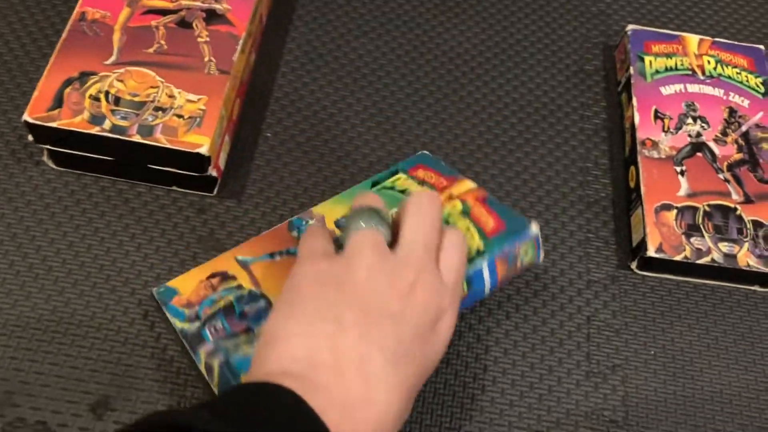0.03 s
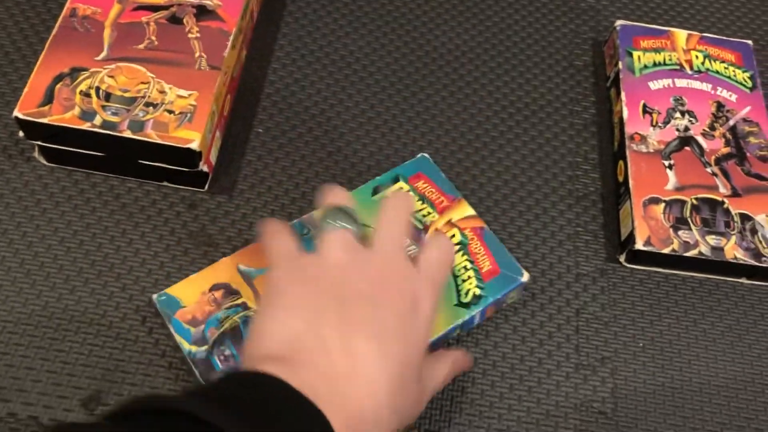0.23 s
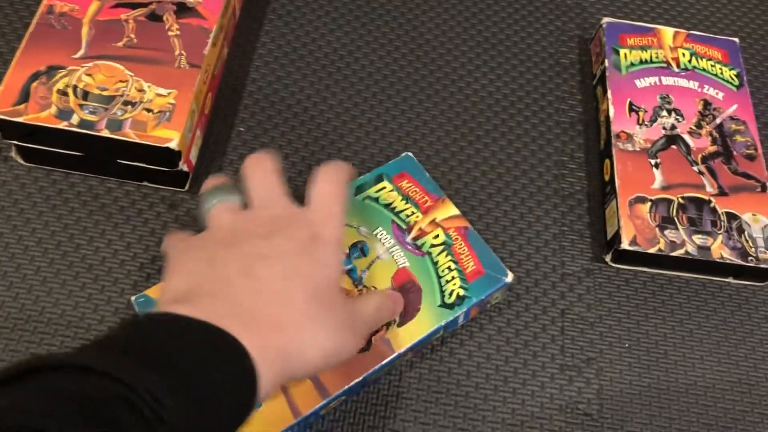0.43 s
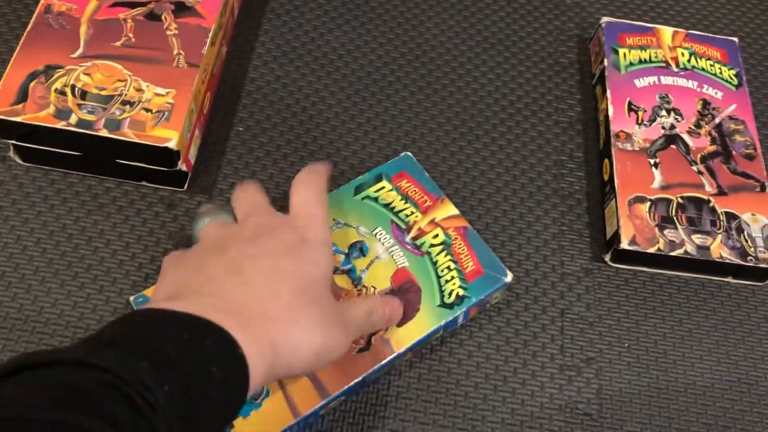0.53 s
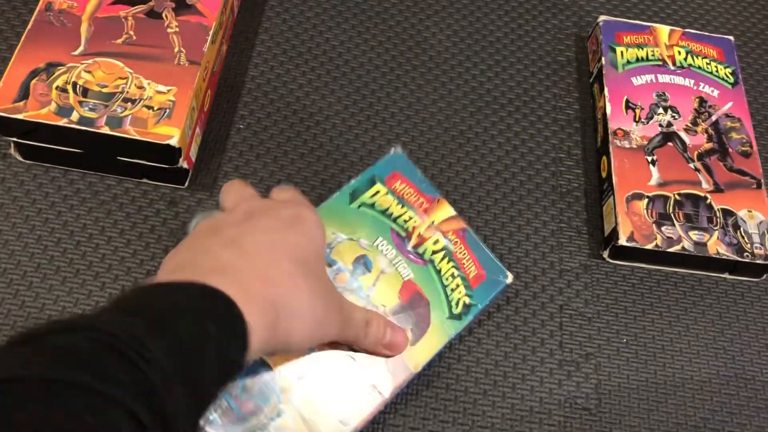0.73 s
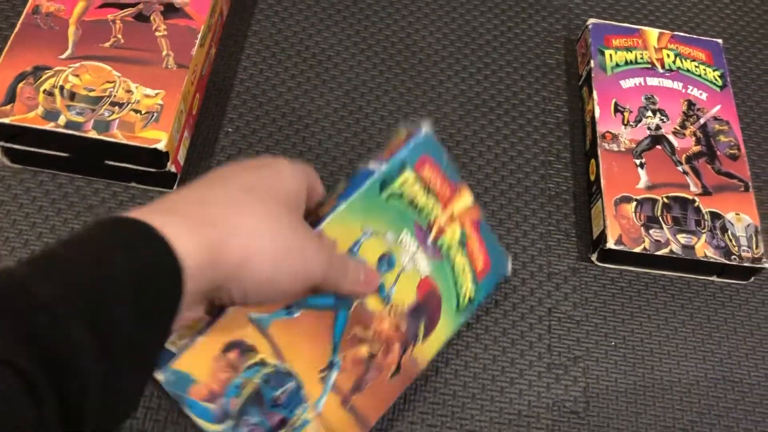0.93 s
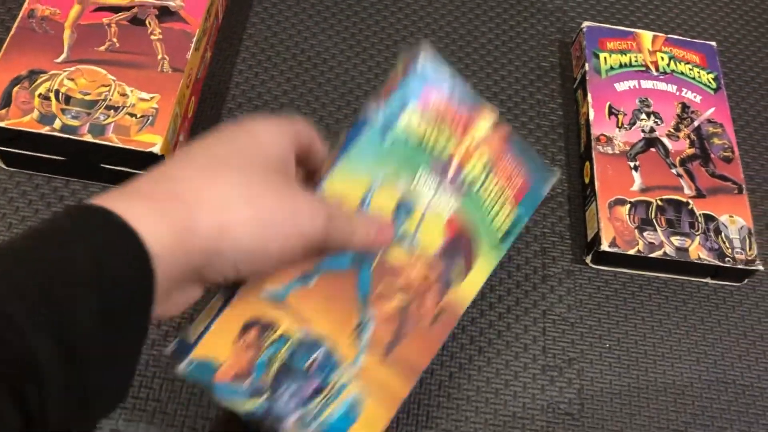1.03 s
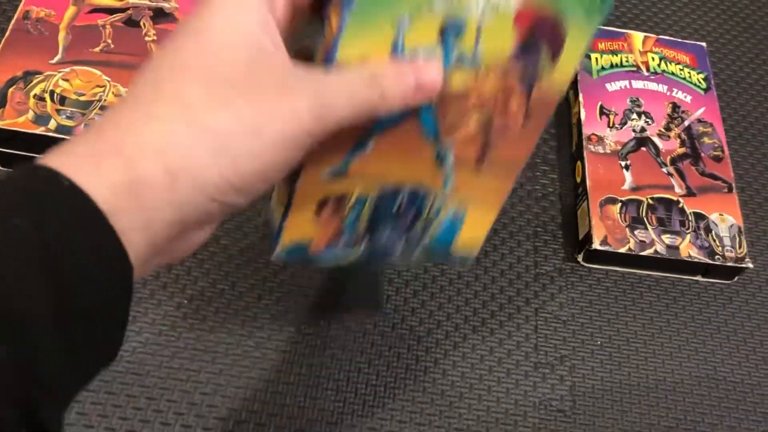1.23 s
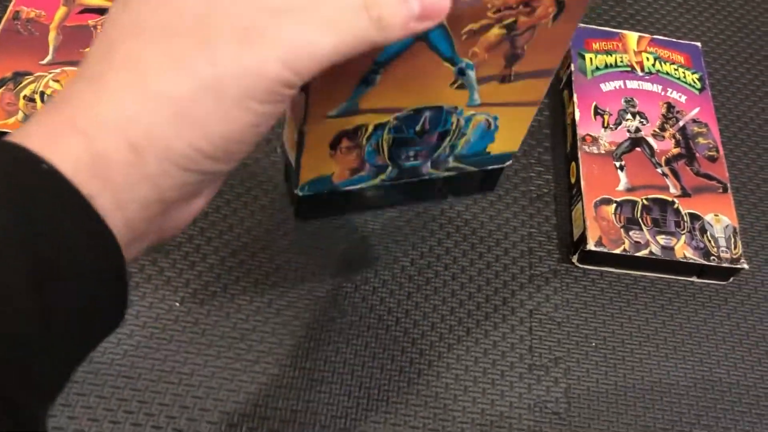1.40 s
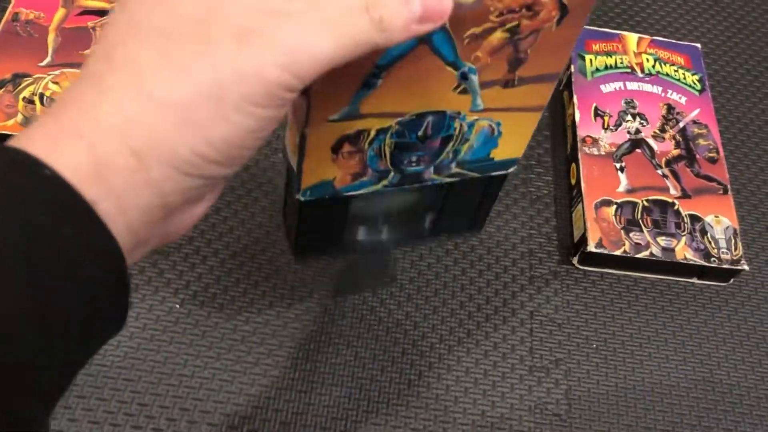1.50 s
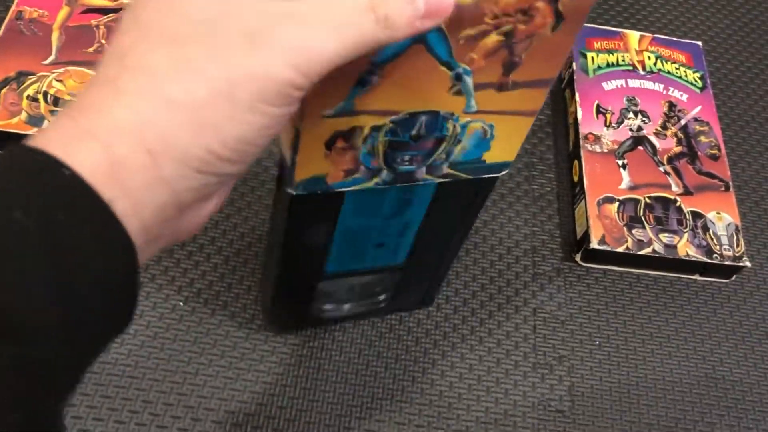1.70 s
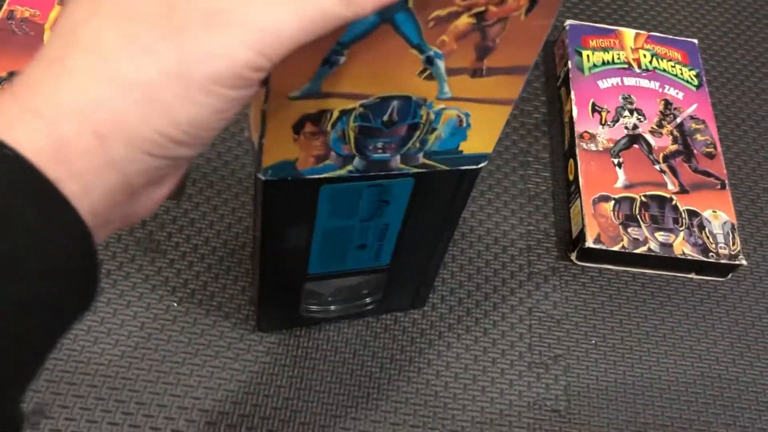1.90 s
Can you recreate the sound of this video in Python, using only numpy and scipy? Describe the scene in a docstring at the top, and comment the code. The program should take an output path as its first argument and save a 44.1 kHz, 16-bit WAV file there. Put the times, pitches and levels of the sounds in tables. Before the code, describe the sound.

A video cassette is handled and slid from its cardboard sleeve, close up in a small quiet room. Soft rubs and finger taps fill the first second, with a hollow thud at 0.2 seconds as the box tips flat. From about 1.3 seconds the cassette slides out with a hiss and a rising zip, landing near 1.65 with a plastic clack, brief rattle and soft table boom. Faint rubbing follows.

```python
"""First, soft rubs and finger taps, close to the microphone: a hand turns a boxed video cassette on a
padded table. The box tips flat with a hollow thud and is gripped and lifted. The cassette slides out
of its cardboard sleeve, hissing, its ribs zipping ever faster, and lands with a plastic clack and a
rattle while the table top booms softly. One microphone, in a small quiet room that answers briefly."""
import sys
import numpy as np
from scipy import signal
from scipy.fft import rfft, irfft, next_fast_len
from scipy.io import wavfile
from scipy.ndimage import map_coordinates

SR = 44100
rng = np.random.default_rng(int(sys.argv[2]) if len(sys.argv) > 2 else 0)


def wav_out(sig):
    """Save sig, one row per channel (or a flat mono array), as 16-bit PCM at SR to the path in sys.argv[1]."""
    wavfile.write(sys.argv[1], SR, np.round(np.clip(np.atleast_2d(sig).T, -1, 1) * 32767).astype(np.int16))


N = 85995


def amp(db):
    """Decibels to gain."""
    return 10 ** (np.asarray(db) / 20)


def unit_rms(x):
    """Scale to rms 1."""
    return x / np.sqrt(np.mean(x ** 2) + 1e-20)


def at_hz(points, hz):
    """Read (freq_hz, value) points along a log frequency axis."""
    freqs, values = np.transpose(points)
    return np.interp(np.log(hz + 1), np.log(freqs + 1), values)


def since(start_s):
    """Seconds since a moment, zero before it."""
    return np.maximum(np.arange(N) / SR - start_s, 0)


def curves(rows):
    """One value per sample for each column after the time."""
    times, *columns = np.transpose(rows)
    return [np.interp(since(0), times, column) for column in columns]


def swells(rows):
    """Bell-shaped strokes from (peak_s, half_width_s, level_db) rows."""
    return sum(amp(db) * np.exp(-((since(0) - s) / width) ** 2) for s, width, db in rows)


def wobble(rate_hz):
    """A smooth random curve, rate_hz knots a second."""
    return map_coordinates(rng.standard_normal(N // 8), [since(0) * rate_hz], mode="wrap")


def filtered(x, response):
    """Shape x by a gain that depends on frequency."""
    size = next_fast_len(N + SR // 2)
    return irfft(rfft(x, size) * response(np.fft.rfftfreq(size, 1 / SR)), size)[:N]


def noise(spectrum, grain_db=0):
    """Coloured noise of rms 1, clumped into grains by grain_db."""
    grains = rng.standard_normal(N) * amp(grain_db * wobble(900))
    return unit_rms(filtered(grains, lambda hz: amp(at_hz(spectrum, hz))))


def ring(start_s, modes, attack_s, low_hz):
    """Damped modes of a struck body that hardly radiates below low_hz."""
    t = since(start_s)
    tones = sum(amp(db - 60 * t / t60) * np.sin(2 * np.pi * hz * t) for hz, db, t60 in modes)
    onset = 1 - np.exp(-t / attack_s)
    return signal.sosfilt(signal.butter(4, low_hz, "high", fs=SR, output="sos"), onset * tones)


def burst(start_s, spectrum, t60_s):
    """A dying puff of contact noise."""
    t = since(start_s)
    return (t > 0) * amp(-60 * t / t60_s) * noise(spectrum)


# The still air of the room: freq_hz, level_db
ROOM_TONE_SPECTRUM = [(15, -39), (25, -14.5), (87, 6.5), (157, -2.5), (242, 3), (427, -9.5), (775, -18),
                      (1100, -22), (5570, -24), (14800, -27.5), (16000, -33)]


def room_tone():
    """A faint, steady rumble and hiss all around the microphone."""
    return amp(-66) * noise(ROOM_TONE_SPECTRUM)


# Decay between the near walls: freq_hz, t60_s
ROOM_DECAY = [(150, 0.32), (500, 0.36), (2000, .34), (5500, 0.31), (9000, 0.21), (15000, 0.3)]
# Colour of the reflections: freq_hz, level_db
ROOM_SPECTRUM = [(60, -0.5), (250, 3.5), (700, 3), (2000, 2.5), (6000, 0.5), (15000, -0.5)]


def in_room(direct, wet_db):
    """The close sound plus a room tail in which each frequency dies at its own speed."""
    hz, t, bands = signal.stft(rng.standard_normal(SR // 2), SR, nperseg=256)
    decay = amp(at_hz(ROOM_SPECTRUM, hz)[:, None] - 60 * t / at_hz(ROOM_DECAY, hz)[:, None])
    tail = signal.istft(bands * decay, SR, nperseg=256)[1]
    tail *= 1 - np.exp(-np.arange(len(tail)) / SR / 0.005)  # the reflections build up
    return direct + amp(wet_db) * signal.fftconvolve(direct, tail / np.linalg.norm(tail))[:N]


# Rubbing down on the mat: time_s, hiss_db, body_db
RUB_LEVELS = [(0.005, -59.5, -60), (0.055, -69, -69.5), (0.085, -61, -68), (0.125, -58, -56.5),
              (0.165, -72.5, -75), (0.195, -60, -53.5), (0.225, -69.5, -64), (0.45, -80.5, -83),
              (0.55, -73.5, -65), (0.583, -62, -69.5), (0.615, -65, -66), (0.665, -61, -63),
              (0.735, -64.5, -60), (0.76, -57, -55), (0.83, -58.5, -63.5), (0.89, -56.5, -51.5),
              (0.96, -65, -69.5), (1.03, -85.5, -79), (1.09, -69, -73), (1.13, -76.5, -81),
              (1.155, -59, -72), (1.2, -89, -77), (1.76, -58, -57), (1.82, -61.5, -65), (1.865, -53, -55.5),
              (1.9, -61, -60), (1.95, -56, -87)]
# Its bright hiss and its dull body: freq_hz, level_db
RUB_HISS_SPECTRUM = [(600, -21), (1000, -4), (2000, -5.5), (3200, -8), (5000, -5.5), (8000, -12.5),
                     (12000, -18.5), (16000, -20)]
RUB_BODY_SPECTRUM = [(100, -15.5), (200, -6.5), (350, -2.5), (560, -0.5), (750, -14.5), (1100, -12),
                     (1800, -15.5), (3000, -38)]


def rubbing():
    """Fingers and box rub on the mat with a grainy friction noise."""
    hiss_db, body_db = curves(RUB_LEVELS)
    hiss = amp(hiss_db) * noise(RUB_HISS_SPECTRUM, grain_db=2)
    body = amp(body_db) * noise(RUB_BODY_SPECTRUM, grain_db=2)
    return amp(-0.5) * (hiss + body)


# Fingertip skids on the sleeve: peak_s, level_db
SKID_STROKES = [(0.523, -67.5), (0.579, -55), (0.658, -63), (0.709, -60.5), (0.752, -59), (1.154, -66)]
# Skin brushing the sleeve: peak_s, half_width_s, level_db
BRUSH_STROKES = [(0.115, 0.027, -64.5), (0.583, .012, -63.5), (0.672, 0.044, -61), (0.749, .008, -61),
                 (0.91, 0.02, -61)]
# The narrow scratch of a skid and the airy hiss of a brush: freq_hz, level_db
SKID_SPECTRUM = [(1500, -18), (2500, -6), (3100, -0.5), (3700, -6.5), (5000, -24.5), (10000, -39.5)]
BRUSH_SPECTRUM = [(2000, -27), (5500, -8.5), (9000, 2), (12000, -5), (16000, -3.5)]


def finger_strokes():
    """Skin skids roughly and brushes smoothly over the glossy card."""
    skid_envelope = swells([(s, 0.012, db) for s, db in SKID_STROKES])
    skids = skid_envelope * noise(SKID_SPECTRUM, grain_db=5.5)
    brushes = swells(BRUSH_STROKES) * noise(BRUSH_SPECTRUM)
    return skids + brushes


# Fingers landing on the box: start_s, level_db, pitch_hz, tick_over_tap_db
FINGER_TAPS = [(0.078, -42.5, 473, -10.5), (0.138, -38.5, 410, -17), (0.181, -44, 312, -4.5),
               (0.581, -36, 359, -19), (0.712, -38, 610, -11.5), (0.781, -41, 578, 1.5),
               (0.789, -38, 542, 1.5), (0.961, -38.5, 240, -9), (1.809, -44, 555, -3.5)]
# The tick of skin meeting card: freq_hz, level_db
TICK_SPECTRUM = [(300, -11.5), (700, 3), (1500, 0), (4500, -5.5), (7500, -15.5), (16000, -30)]


def finger_taps():
    """Each tap ticks and briefly rings two modes of the cardboard."""
    taps = np.zeros(N)
    for s, db, hz, tick_db in FINGER_TAPS:
        card_modes = [(hz, 0, 0.032), (1.54 * hz, -8.5, 0.032)]  # pitch_hz, level_db, t60_s
        knock = ring(s, card_modes, attack_s=0.0012, low_hz=130)
        tick = amp(tick_db) * burst(s, TICK_SPECTRUM, t60_s=0.036)
        taps += amp(db) * (knock + tick)
    return taps


# The table top under the mat: pitch_hz, level_db, t60_s
TABLE_MODES = [(64.7, -5, 0.062), (100, -1, .06), (165, -6, .06)]
# Blows that reach it through the padding: start_s, level_db
TABLE_HITS = [(0.232, -35), (1.664, -24.5), (1.736, -42)]


def table_boom():
    """The table top booms softly under the box and the cassette."""
    return sum(amp(db) * ring(s, TABLE_MODES, attack_s=0.0034, low_hz=48) for s, db in TABLE_HITS)


# The sleeve's edge catching: peak_s, half_width_s, level_db
EDGE_CATCHES = [(1.365, 0.015, -41.5), (1.468, 0.022, -44.5), (1.555, 0.032, -46.5), (1.632, 0.029, -39)]
# The cassette's scrape along the sleeve: time_s, level_db
SLIDE_LEVELS = [(1.23, -89), (1.264, -60.5), (1.328, -47), (1.528, -36.5), (1.598, -39), (1.64, -36.5)]
# The rasp of a catch and the hiss of the scrape: freq_hz, level_db
CATCH_SPECTRUM = [(200, -22), (650, -13), (930, -2), (1150, -3), (1400, -3.5), (2200, -19), (6000, -15),
                  (16000, -47)]
SLIDE_SPECTRUM = [(80, -27.5), (180, -12.5), (450, -7.5), (650, -11.5), (950, -2.5), (1400, -2),
                  (2300, -4.5), (3300, -4), (6000, -4), (8000, -6), (11000, -10.5), (16000, -14)]


def cassette_slide():
    """Plastic hisses and catches on cardboard; the shell's fine ribs zip past the edge ever faster."""
    stop_s, fade_db_per_s, growth_per_s = 1.655, 404.5, 3.85
    moving_s = np.minimum(since(0), stop_s)
    rib_hz = 276 * np.exp(growth_per_s * (moving_s - 1.44))
    jitter = 1 + 0.02 * wobble(300)
    phase = 2 * np.pi * np.cumsum(rib_hz * jitter) / SR
    harmonics_db = [-6.5, -4, -6]
    ribs = sum(amp(db + 2.2 * wobble(40)) * np.sin(k * phase) for k, db in enumerate(harmonics_db, 1))
    ribs = ribs * rib_hz / rib_hz.max()  # faster is stronger
    zipping = filtered(ribs, lambda hz: amp(at_hz(SLIDE_SPECTRUM, hz)))
    hiss = amp(1.5 + 0.91 * wobble(70)) * noise(SLIDE_SPECTRUM, grain_db=1.5)
    catches = swells(EDGE_CATCHES) * noise(CATCH_SPECTRUM, grain_db=3)
    level_db, = curves(SLIDE_LEVELS)
    envelope = amp(level_db - fade_db_per_s * since(stop_s))
    return envelope * (hiss + zipping) + catches


# The box meets the mat, edge first, then flat: start_s, knock_db, slap_db
BOX_CONTACTS = [(0.2238, -27.5, -20), (0.2278, -5, -27.5)]
# The box with the cassette inside: pitch_hz, level_db, t60_s
BOX_MODES = [(223.5, -15.5, 0.086), (320, -2, .04), (385, 2, 0.022), (467, -4, 0.012), (591, -20, 0.068),
             (1148, -25.5, .04), (1369, -13, 0.023), (1430, -16.5, .04), (1692, -28, .04)]
# Card slapping the mat: freq_hz, level_db
SLAP_SPECTRUM = [(60, -36), (200, -2), (550, 3.5), (850, -7.5), (1450, 3.5), (2100, -4.5), (3000, -4),
                 (5000, -8), (8500, -13.5), (11000, -22), (16000, -20.5)]


def box_fall():
    """The full box tips over near the microphone with a slap and a hollow knock."""
    knock = -sum(amp(db) * ring(s, BOX_MODES, attack_s=0.00076, low_hz=198) for s, db, _ in BOX_CONTACTS)
    slap = sum(amp(db) * burst(s, SLAP_SPECTRUM, t60_s=0.031) for s, _, db in BOX_CONTACTS)
    return in_room(knock, wet_db=-22) + in_room(slap, wet_db=-12)


# The cassette lands and rattles: start_s, ring_db, crack_db
SHELL_CONTACTS = [(1.652, -47, -21.5), (1.6532, -16, -9), (1.6535, -28.5, -11.5), (1.6559, -9, -15),
                  (1.6604, -21.5, -22), (1.671, -31.5, -29.5), (1.718, -25.5, -35.5)]
# Its plastic shell: pitch_hz, level_db, t60_s
SHELL_MODES = [(247, -17.5, 0.07), (389, -6.5, 0.037), (621, -11.5, 0.062), (944, -7, 0.041),
               (1013, -6, 0.025), (1230, -9.5, 0.03), (1496, -15, 0.025), (1666, -10.5, 0.029),
               (2130, -14.5, 0.032), (3318, -16.5, 0.051), (4415, -16, 0.028), (5214, -8, 0.042),
               (5700, -13, 0.043), (6150, -7, 0.02)]
# The crack of hard plastic at close range: freq_hz, level_db
CRACK_SPECTRUM = [(40, -38), (250, -6), (600, -2), (780, -7), (1050, 1.5), (1700, 1.5), (2600, -6.5),
                  (4000, -0.5), (6000, 0), (8500, -2), (10500, -8.5), (12500, -5), (16000, -10.5)]


def cassette_landing():
    """The shell hits the table and its loose reels rattle; each contact excites the room anew."""
    clatter = np.zeros(N)
    for s, ring_db, crack_db in SHELL_CONTACTS:
        shell = amp(ring_db) * ring(s, SHELL_MODES, attack_s=0.000214, low_hz=181)
        crack = amp(crack_db) * burst(s, CRACK_SPECTRUM, t60_s=0.02)
        clatter += in_room(shell, wet_db=-15.5) + in_room(crack, wet_db=-8)
    return clatter


def scene():
    """Everything as heard from beside the table, in mono, over the room tone."""
    handling = in_room(rubbing() + finger_strokes() + finger_taps() + cassette_slide(), wet_db=-13)
    return (room_tone() + handling + table_boom() + box_fall() + cassette_landing())[None]


def record(dry):
    """The camera's microphone channel passes nothing above 16 kHz."""
    return filtered(dry[0], lambda hz: hz < 16000)[None]


dry = scene()
out = record(dry)
wav_out(out)
```